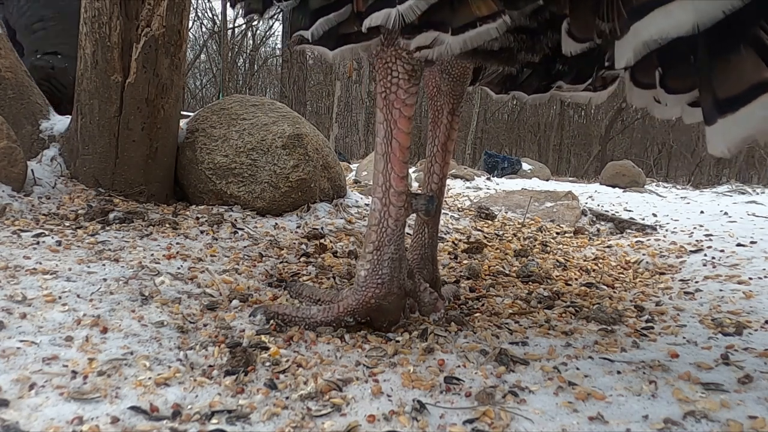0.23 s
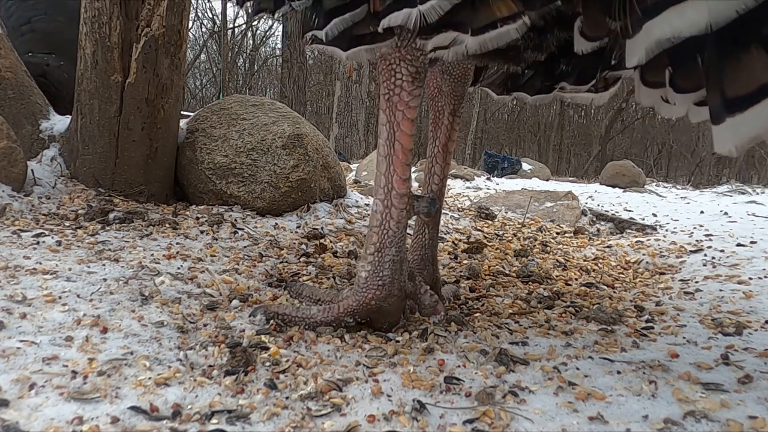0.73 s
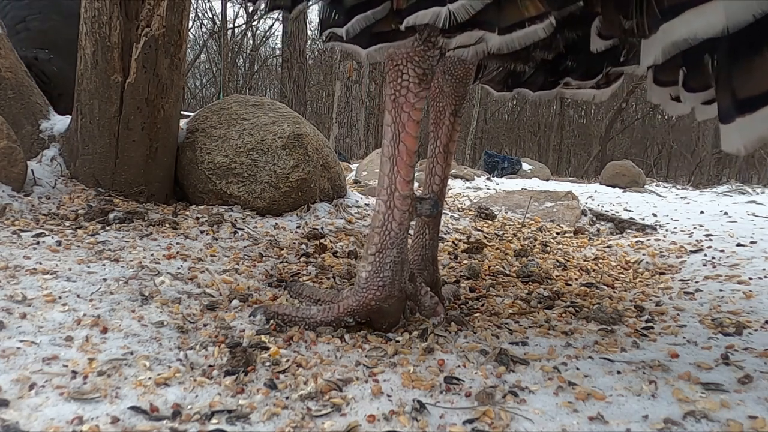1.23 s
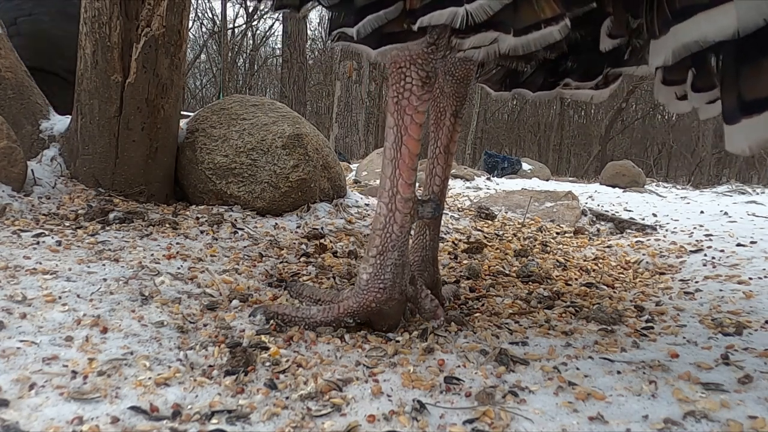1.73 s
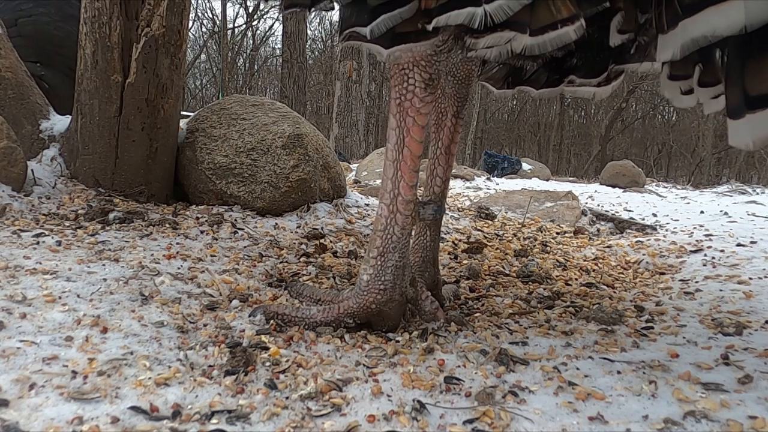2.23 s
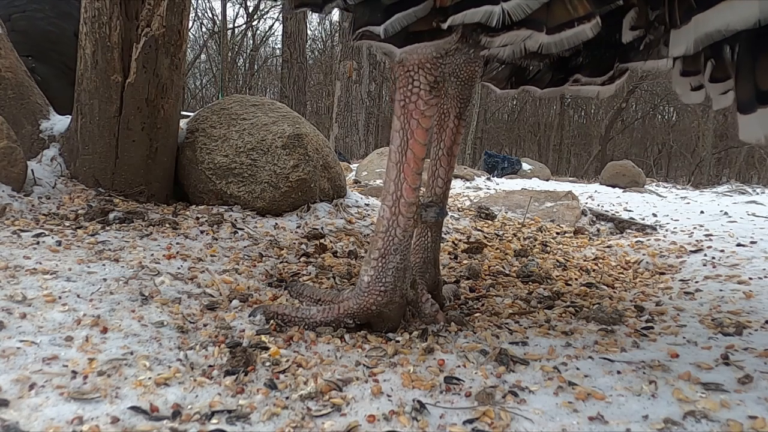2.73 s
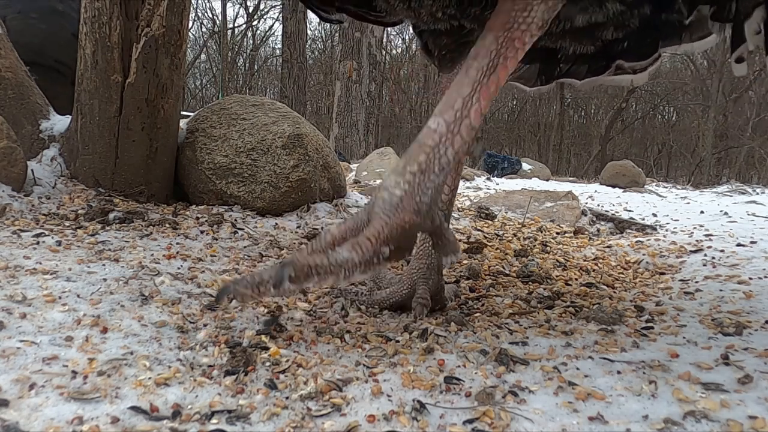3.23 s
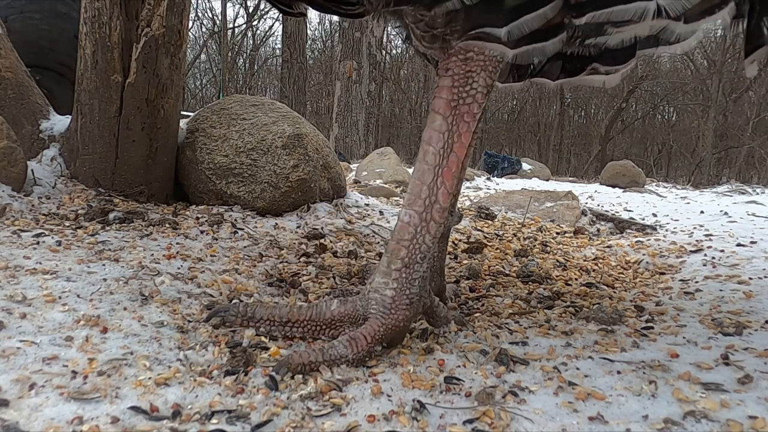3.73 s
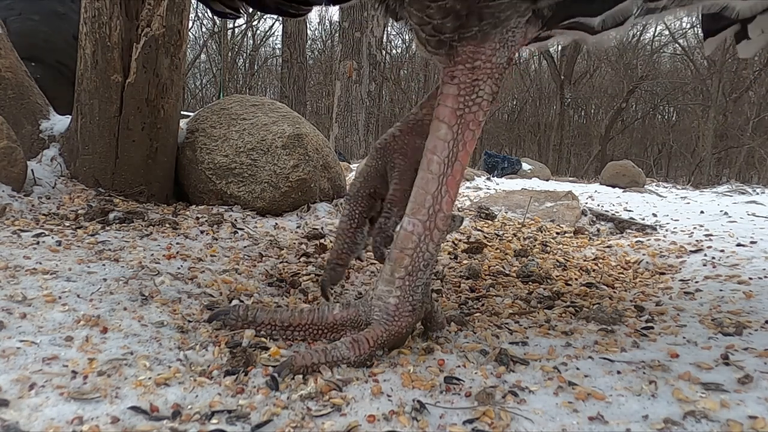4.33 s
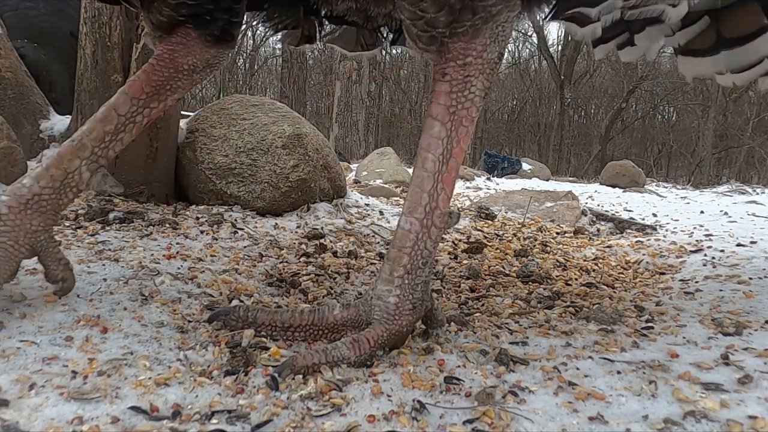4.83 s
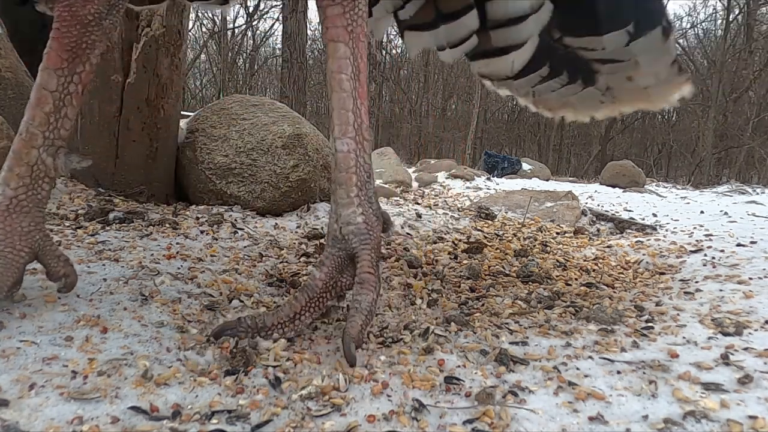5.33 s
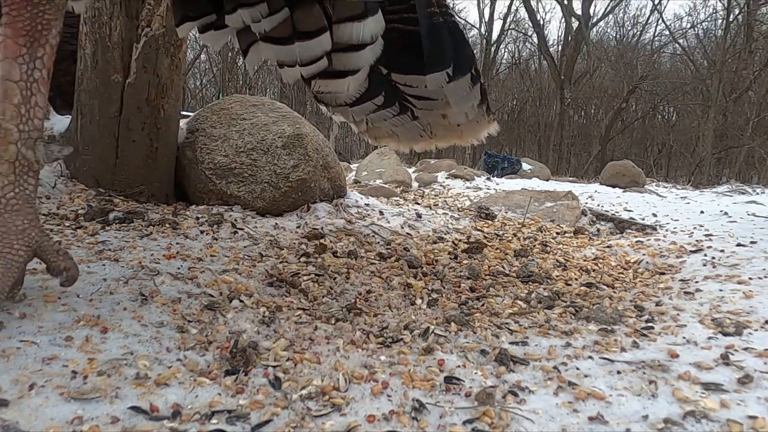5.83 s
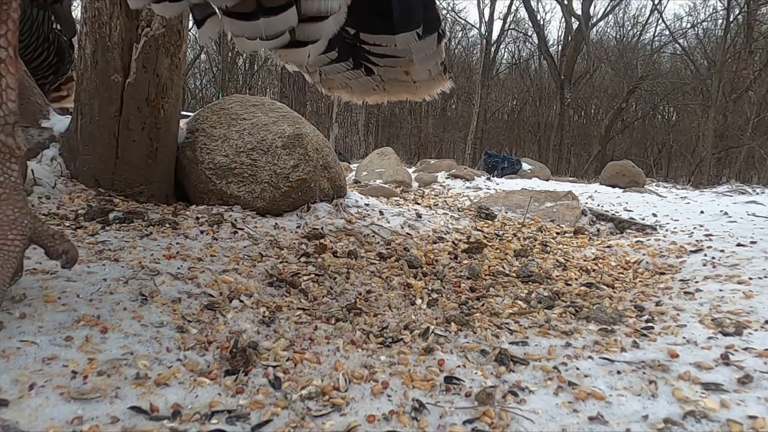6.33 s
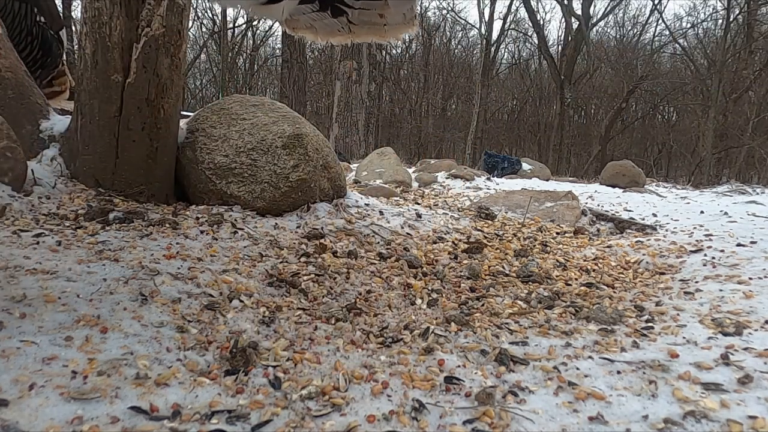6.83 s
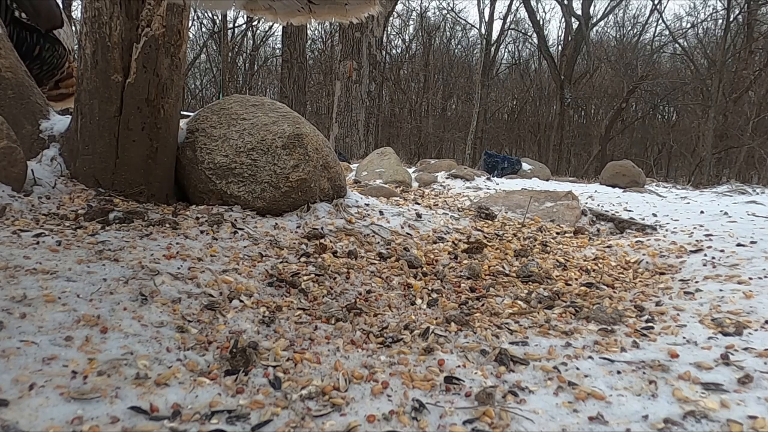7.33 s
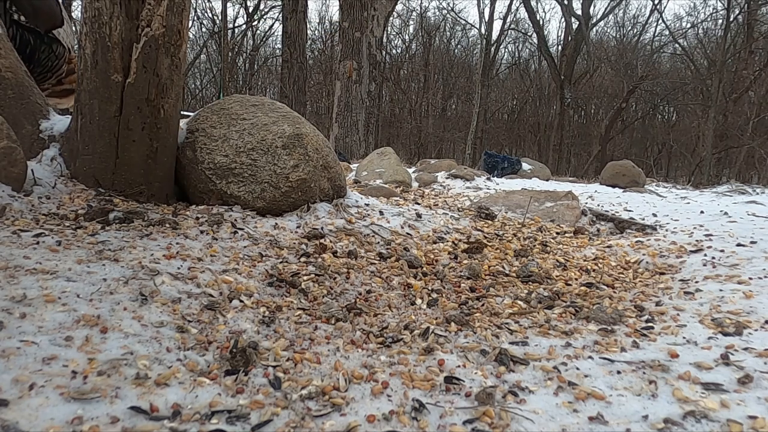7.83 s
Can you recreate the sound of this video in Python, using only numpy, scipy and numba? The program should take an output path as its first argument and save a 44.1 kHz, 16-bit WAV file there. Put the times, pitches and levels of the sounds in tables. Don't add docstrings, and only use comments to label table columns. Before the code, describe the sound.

A wild turkey purrs softly and crunches over seed husks on snow, then lets out one loud close gobble amid distant rumble and faint birds.

```python
import sys
import numpy as np
from scipy import signal
from scipy.fft import rfft, irfft
from scipy.io import wavfile
from scipy.ndimage import uniform_filter1d
from numba import njit

SR = 44100
rng = np.random.default_rng(int(sys.argv[2]) if len(sys.argv) > 2 else 0)


def persist_wave(psi):
    counts = np.round(np.clip(psi, -1, 1) * 32767).astype(np.int16)
    wavfile.write(sys.argv[1], SR, np.atleast_2d(counts).T)


def ratio(d):
    e = np.asarray(d, float) / 20
    return 10 ** e


N = 356548

# (time [s], held [s], drop [s], pitch [Hz], level [dB])
SQUEAKS = [
    (5.463, .012, 0.015, 3120, -33),
    (5.528, 0.018, 0.0077, 2878, -23),
    (5.667, 0.011, 0.0063, 2428, -28.5),
    (5.722, 0.013, 0.0052, 2473, -21.5),
    (5.856, 0.0079, 0.01, 2430, -36.5),
    (6.126, 0.0081, 0.011, 2480, -34.5),
]


def gobble():
    high, high_tops, drive = high_side()
    hoarse = np.clip(drive / 0.076, 0, 1)
    low, low_tops, push = low_side(hoarse)
    squeaks, leak = squeak()
    slack, slack_tops, swing = flutter()
    throb_depth = .6
    shake = ratio(0.22 * hoarse * walk(240)) * (1 + throb_depth * slack / (swing + 0.016))
    beat = 0.92 * (low * high_tops + high * low_tops)
    hiss = 0.45 * (drive + 0.15 * push + 0.4 * leak) * rng.standard_normal(N)
    tires_s, tire_db_per_s = 5.89, -24.5
    tire = ratio(tire_db_per_s * np.clip(np.arange(N) / SR - tires_s, 0, 1))
    tops = tire * (shake * (low_tops + high_tops + beat) + hiss)
    voice = windpipe(shake * (low + high)) + passband(throat(tops, hoarse), 570, 12500)
    return voice + squeaks + puff(low_tops) + slack + slack_tops + chest(push * tire ** 2)


def high_side():
    # (time [s], length [s], from [Hz], to [Hz], level [dB])
    high_rows = [(5.289, 0.018, 733, 750, -22), (5.391, 0.044, 921.8, 769.4, -19),
                 (5.488, 0.024, 1003, 1001, -31), (5.551, 0.019, 711, 731, -15),
                 (5.572, 0.06, 884, 1064, -20), (5.688, 0.014, 914.2, 871.5, -16.5),
                 (5.741, 0.014, 956, 929.4, -15.5), (5.793, 0.044, 869.4, 844, -28),
                 (5.877, 0.017, 946, 988.6, -19), (5.988, 0.015, 893, 925.5, -21),
                 (6.059, 0.037, 845.5, 832, -21.5), (6.148, 0.011, 922, 956, -22.5)]
    aftertone = (5.65, 0.03, 1085, 1050, -31)
    top_rich, short_rich, richer_per_s = 0.86, 0.51, 6.3
    notes = [(*n, min(top_rich, short_rich + richer_per_s * n[1])) for n in high_rows]
    return sing(sorted(notes + [(*aftertone, 0)]), .04 * walk(700), 0.008, .003)


def low_side(hoarse):
    # (time [s], length [s], from [Hz], to [Hz], level [dB])
    low_rows = [(5.289, 0.021, 536.4, 547.5, -17), (5.31, 0.023, 599, 624.6, -20),
                (5.331, 0.011, 605, 506, -26), (5.345, 0.044, 513, 678, -19),
                (5.381, 0.016, 721.4, 739.5, -18.5), (5.397, 0.041, 690, 604.4, -24.5),
                (5.487, 0.022, 680.6, 634, -21.5), (5.549, 0.081, 552.7, 599.7, -29.5),
                (5.795, 0.0098, 571.8, 603, -14.5), (5.807, 0.019, 615.5, 669.6, -24),
                (5.881, 0.0087, 678.6, 665, -17.5), (5.897, 0.025, 629, 692, -24),
                (5.921, 0.016, 718, 689.7, -21.5), (5.938, 0.025, 600.4, 600.3, -15.5),
                (5.966, 0.024, 590.6, 516.2, -15.5), (6.06, 0.035, 518, 681.6, -23.5)]
    # (time [s], pitch [Hz], level [dB])
    gulps = [
        (5.438, 680, -12.5),
        (5.504, 649, -10),
        (5.636, 619.8, -14.5),
        (5.703, 571, -15),
        (5.752, 604.8, -21.5),
        (5.829, 566.4, -13),
        (6.004, 519, -18),
        (6.096, 527.5, -13.5),
    ]
    rich, free_db, purer_per_db = 0.86, -17.5, 0.2
    gulp_s, gulp_sag, gulp_rich = .011, .085, 0.31
    notes = [(*n, rich - purer_per_db * max(n[-1] - free_db, 0)) for n in low_rows]
    notes += [(s, gulp_s, hz, hz * (1 - gulp_sag), db, gulp_rich) for s, hz, db in gulps]
    return sing(sorted(notes), (0.008 + 0.055 * hoarse) * walk(600), 0.0047, 0.0031)


def squeak_notes():
    sag, end_hz, squeak_rich, fall_rich = 0.018, 1700, 0.1, 0.38
    fall_db = -6.5
    notes = []
    for s, held, drop, hz, db in SQUEAKS:
        knee_hz = hz * (1 - sag)
        notes.append((s, held, hz, knee_hz, db, squeak_rich))
        notes.append((s + held, drop, knee_hz, end_hz, db + fall_db, fall_rich))
    return notes


def squeak():
    thin, thin_tops, leak = sing(squeak_notes(), 0.033 * walk(900), .003, 0.007)
    rasp_db, rasp_hz, rasp_width_hz = -17, 4350, 900
    drops = [(s + held, drop, db + rasp_db) for s, held, drop, hz, db in SQUEAKS]
    rasp = steep_band(rng.standard_normal(N), rasp_hz, rasp_width_hz)
    rasp *= 6 * ratio(bursts(drops, 4400, 1500))
    return thin + passband(thin_tops, 3900, 5800) + rasp, leak


def puff(low_tops):
    puff_hz, puff_width_hz, edge_db_per_s = 6900, 2300, 1499
    level_db = bursts([(5.378, 0.014, -37)], edge_db_per_s, edge_db_per_s)
    jet = rng.standard_normal(N) + 8 * low_tops
    return 4.3 * ratio(level_db) * steep_band(jet, puff_hz, puff_width_hz)


def flutter():
    # (time [s], length [s], from [Hz], to [Hz], level [dB])
    flutter_rows = [
        (5.293, 0.017, 177.5, 176.4, -24),
        (5.401, 0.044, 210.5, 199.5, -23.5),
        (5.491, 0.013, 180, 176.6, -29.5),
        (5.552, 0.043, 129.3, 168.1, -37.5),
        (5.6, 0.038, 174.3, 214.2, -32),
        (5.688, .016, 189.9, 188.8, -37),
        (5.747, 0.014, 186, 180.2, -38),
        (5.796, 0.012, 183, 194.4, -31.5),
        (5.879, 0.013, 224, 231.3, -43),
        (6.064, 0.033, 164.2, 186.3, -34.5),
    ]
    buzz_rich, settles_s = .4, .036
    notes = [(*n, buzz_rich * (n[1] < settles_s) + 0.12) for n in flutter_rows]
    return sing(notes, 0.035 * walk(100), 0.0047, 0.0013)


def throat(tops, hoarse):
    # (centre [Hz], width [Hz], level [dB])
    shut_rows = [(1150, 410, -8.5), (1720, 554, -1), (2360, 200, -21), (4230, 400, -14.5),
                 (6300, 660, -19.5), (8700, 1200, -22), (11500, 5000, -30.5)]
    # (centre [Hz], width [Hz], level [dB])
    open_rows = [(1480, 180, -10), (1800, 530, -8), (2230, 330, -4), (3000, 280, -5), (3390, 50, -14.5),
                 (4200, 380, -5.5), (4750, 400, -5), (5520, 260, -12), (7000, 2400, -20),
                 (10800, 21000, -33.5)]
    # (time [s], centre [Hz], level [dB], treble let out [dB])
    mouth = [
        [(5.29, 2310, -3, 2.5), (5.33, 2340, -3, 1), (5.345, 2300, -3, -9), (5.372, 2300, -2.5, -15),
         (5.39, 2360, -3, -2), (5.44, 2520, -7.5, -1)],
        [(5.485, 2810, 1.5, 3), (5.515, 2910, 1.5, -3.5), (5.56, 1960, -6.5, 0), (5.60, 2680, 2, 1),
         (5.645, 2739, -5, 0.5), (5.685, 3000, 4, 1), (5.745, 3020, 1, -1.5), (5.77, 3000, -11.5, -4.5)],
        [(5.80, 2580, -4.5, -1), (5.835, 2830, -2, 0), (5.88, 3000, -6, -1), (5.93, 2708, 1, 0),
         (5.955, 3000, -0.5, 7.5), (6.0, 2920, 2, -5.5), (6.07, 2676, -4, -5.5), (6.1, 2711, -2, 1),
         (6.155, 2820, -1, 4)],
    ]
    # (centre [Hz], width [Hz], share swallowed)
    pockets = [
        (1200, 260, .95),
        (3620, 600, .9),
        (6100, 500, .5),
    ]
    # (centre [Hz], width [Hz], level [dB])
    sacs = [(1010, 12, -14), (1510, 12, -4), (2660, 18, -14), (3230, 16, -6), (5300, 30, -16)]
    mouth_hz, mouth_db, treble_db = curve(sum(mouth, []))
    mouth_width_hz, beak_opens_s = 260, 5.39
    beak = np.clip((np.arange(N) / SR - beak_opens_s) / .015 + .5, 0, 1)
    upper = ratio(treble_db) * passband(tops, 3300, 16000)
    clear = .4 - .1 * hoarse
    tops = passband(tops, 300, 3300) + upper * (.45 + clear + (.8 - clear) * walk(3500))
    out = np.zeros(N)
    for rows, share in ((shut_rows, 1 - beak), (open_rows, beak)):
        for hz, width, db in rows:
            waver = ratio(db + 6 + 1.6 * walk(70))
            out += waver * band(band(share * tops, hz, width), hz, 0.85 * width)
    gape = glide(glide(beak * tops, mouth_hz, 1. * mouth_width_hz), mouth_hz, 1. * mouth_width_hz)
    out += ratio(mouth_db + 9) * gape
    for hz, width, share in pockets:
        out = out - share * beak * band(out, hz, width)
    out = out - .9 * (1 - beak) * band(out, 3350, 1100)
    return out + sum(ratio(db) * band(band(beak * tops, hz, 5 * width), hz, width) for hz, width, db in sacs)


def windpipe(fundamentals):
    pipe = passband(fundamentals, 460, 1130)
    return pipe + .21 * band(pipe, 550, 55) + .25 * band(pipe, 930, 49) + .15 * band(pipe, 810, 14)


def chest(breath):
    # (time [s], hold [s], level [dB], pitch [Hz])
    gasps = [(5.30, 0.03, -18, 66.9), (5.345, 0.021, -26.5, 65.4), (5.46, 0.0052, -24.5, 81.1),
             (5.53, 0.0059, -26, 84), (5.59, 0.049, -38, 62.5), (5.67, .02, -30, 78.8),
             (5.725, 0.012, -29, 88.4), (5.805, 0.025, -27, 80.4), (5.86, 0.022, -27.5, 78.1),
             (5.94, 0.0092, -32.5, 67.6), (5.99, 0.035, -35, 72.3), (6.06, 0.035, -29.5, 80.8),
             (6.13, 0.042, -29, 82.5), (6.2, 0.021, -41.5, 84.2)]
    hz = curve(gasps)[-1]
    db = bursts([g[:-1] for g in gasps], 519.5, 440)
    turn = 2 * np.pi * np.cumsum(hz * (1 + 0.07 * walk(50))) / SR
    boom = np.sqrt(2) * ratio(db + 2.2 * walk(60)) * (np.sin(turn) + .14 * np.cos(2 * turn))
    deep = passband(rng.standard_normal(N), 21, 55) * np.sqrt(SR / 70)
    soft = passband(rng.standard_normal(N), 55, 140) * np.sqrt(SR / 540)
    return boom + ratio(db - 9) * deep + (ratio(db - 13.5) + 0.035 * breath) * soft


def purr():
    # (time [s], pitch [Hz], level [dB])
    warbles = [
        [(.007, 688, -45.5), (.040, 851, -45), (.052, 652, -53), (.065, 1070, -56), (.076, 960, -66),
         (.096, 878, -38.5), (.115, 853, -45), (.129, 1150, -75)],
        [(2.717, 829, -47), (2.739, 658, -44.5), (2.760, 1096, -39), (2.778, 820, -45), (2.794, 1150, -73),
         (2.811, 957, -43), (2.833, 651, -42.5), (2.844, 1364, -53), (2.853, 1370, -75)],
    ]
    # (time [s], length [s], from [Hz], to [Hz], level [dB])
    flicks = [
        (0.159, 0.008, 710, 820, -41.5),
        (0.168, 0.0088, 890, 1250, -41),
        (0.215, 0.0079, 770, 1200, -43.5),
        (.262, 0.0083, 816, 1370, -32.5),
        (2.686, 0.011, 484, 642, -50),
        (2.875, 0.014, 815, 946, -37),
        (2.882, 0.00973, 903, 1650, -35.5),
        (2.928, 0.0067, 787, 1450, -42),
        (2.975, 0.01, 824, 1460, -34.5),
    ]
    notes = list(flicks)
    for rows in warbles:
        for a, b in zip(rows, rows[1:]):
            notes.append((a[0], b[0] - a[0], a[1], b[1], a[2]))
    first_rich, second_rich = 0.067, 0.12
    notes = [(*n, first_rich if n[0] < 1 else second_rich) for n in sorted(notes)]
    tone, tops, _ = sing(notes, 0.0125 * walk(400), 0.0049, 0.000084)
    return 1.43 * passband(band(tone + tops, 1010, 460), 400, 2740)


def feet():
    # (time [s], peak level [dB], centre [Hz])
    cracks = [(0.5913, -54, 2100), (.657, -54, 1690), (1.775, -64, 3970), (2.576, -48.5, 2850),
              (3.1897, -37.5, 3150), (3.2366, -44, 1940), (3.436, -53, 3000), (3.443, -38.5, 3300),
              (3.448, -48, 2940), (3.453, -45, 2520), (4.1395, -49, 2600), (4.195, -55, 1800),
              (4.312, -47, 1500), (4.322, -41, 1990), (4.36, -41, 2070), (4.379, -38.5, 1980),
              (4.386, -42, 1700), (4.451, -44.5, 1930), (4.9406, -42.5, 4440), (6.639, -60, 2715),
              (6.819, -50, 1997), (6.9228, -53, 2515), (8, -52.5, 1515)]
    # (time [s], peak level [dB], centre [Hz])
    ticks = [(0.6534, -60, 6500), (2.30, -66, 7500), (2.442, -69, 8000), (2.576, -54.5, 6160),
             (2.586, -60, 7650), (2.62, -57, 7000), (2.698, -61, 7400), (2.707, -58, 7250),
             (2.7898, -59, 6500), (2.805, -63, 7000), (2.87, -68, 7500), (2.8962, -57, 7500),
             (2.935, -63, 7550), (2.9494, -61, 7000), (2.985, -61, 7800), (3.0, -65, 7500),
             (3.02, -62, 7580), (3.04, -58, 7400), (3.1024, -58, 6500), (4.209, -53.5, 5500),
             (4.493, -55, 6000), (5.022, -56, 5600), (7.0443, -58, 5880)]
    # (time [s], hold [s], dull crunch [dB], bright rustle [dB])
    drags = [(2.094, .33, -80.5, -86), (2.58, 0.49, -77.5, -86), (3.222, 0.027, -62, -76.5),
             (3.434, 0.034, -66, -78), (3.52, 0.12, -65.5, -84), (3.66, 0.055, -65.5, -82.5),
             (4.02, 0.094, -71, -88), (4.135, 0.08, -62.5, -79), (4.24, 0.19, -66, -81),
             (4.75, 0.011, -78, -99), (5.0, 0.13, -70.5, -80.5), (5.12, 0.41, -68.5, -83.5),
             (6.799, 0.16, -81, -84), (7.119, 0.0095, -84, -101), (7.53, 0.019, -74, -80.5),
             (7.62, 0.22, -75.5, -81), (7.855, 0.19, -79, -82.5)]
    spray_db = bursts([(s, 0, db) for s, db, hz in cracks], 900, 550)
    dull_drag_db = bursts([(s, hold, dull) for s, hold, dull, bright in drags], 400, 199)
    bright_drag_db = bursts([(s, hold, bright) for s, hold, dull, bright in drags], 400, 199)
    dull_db = np.maximum(spray_db - 22.5, dull_drag_db)
    bright_db = np.maximum(spray_db - 42.5, bright_drag_db)
    size = ratio(2.2 * np.minimum(rng.exponential(size=(2, N)), 5))
    grains = rng.standard_normal((2, N)) * size * (rng.random((2, N)) < .2)
    grains /= grains.std()
    out = ratio(dull_db + 10.0 + 1.8 * walk(60)) * passband(grains[0], 850, 3800)
    out += ratio(bright_db + 14 + 2.5 * walk(60)) * passband(grains[1], 4000, 8800)
    out += ratio(dull_db - 15.5 + 3 * walk(40)) * passband(grains[1], 8800, 15000)
    # (crumble [s], crumble strength, width as a share of the centre)
    husk, ice = (0.006, 0.22, 1), (0.0076, 0.43, .4)
    t = np.arange(1500) / SR
    for s, db, hz, crumble_s, crumble, wide in [(*c, *husk) for c in cracks] + [(*c, *ice) for c in ticks]:
        noise = rng.standard_normal(1500)
        snap = (1 + noise) * np.exp(-t / 0.00035)
        snap += crumble * np.clip(noise, -2.2, 2.2) ** 3 / 3 * np.exp(-t / crumble_s)
        width = wide * hz * 1.1
        crack = band(steep_band(snap, hz, width), hz, width)
        start = int(s * SR)
        out[start:start + 1500] += ratio(db + 2.0) * crack / np.abs(crack).max()
    return out


def songbirds():
    # (time [s], length [s], top [Hz], share of the rise done at the knee, level [dB])
    chips = [
        (2.037, 0.034, 7290, 0.94, -52.5),
        (4.415, 0.056, 7700, 0.63, -61.5),
        (4.722, 0.036, 8200, 0.4, -61),
        (6.787, .034, 7500, .68, -67.5),
        (7.36, 0.071, 7530, 0.75, -72.5),
    ]
    # (time [s], length [s], from [Hz], to [Hz], level [dB])
    slurs = [
        (2.072, 0.021, 4160, 4310, -67),
        (2.081, 0.024, 4200, 2300, -76),
        (3.084, 0.03, 3920, 4020, -69.5),
        (3.11, 0.026, 4030, 3320, -69),
        (3.55, 0.051, 5140, 4670, -67.5),
    ]
    start_hz, knee_time, top_step_db = 5900, 0.68, 0.5
    notes = []
    for s, length, top_hz, rise, db in chips:
        early = knee_time * length
        knee_hz = start_hz + rise * (top_hz - start_hz)
        notes.append((s, early, start_hz, knee_hz, db, 0))
        notes.append((s + early, length - early, knee_hz, top_hz, db + top_step_db, 0))
    song = sing(sorted(notes), 0.0087 * walk(250), 0.0038, 0.0019)[0] * ratio(2.5 * walk(200))
    return song + sing([(*n, 0) for n in slurs], 0.0129 * walk(200), .004, .002)[0]


def chatter():
    # (time [s], length [s], from [Hz], to [Hz], level [dB])
    chatter_rows = [(.45, .08, 4500, 4900, -90), (.53, 0.084, 4930, 5100, -83),
                    (0.635, 0.031, 3980, 3600, -73), (0.682, 0.042, 3500, 3100, -85),
                    (.82, 0.036, 5650, 5180, -80), (0.846, 0.11, 4500, 4550, -74.5),
                    (0.9, 0.071, 4020, 3200, -76), (0.96, 0.1, 4500, 4500, -82),
                    (1.15, 0.08, 4900, 4700, -87), (1.25, 0.067, 3390, 3340, -78),
                    (1.325, 0.021, 5360, 5100, -78), (1.347, 0.038, 3990, 3730, -67.5),
                    (1.373, 0.064, 4850, 4600, -76), (1.443, 0.044, 3630, 3040, -78),
                    (1.506, 0.05, 4750, 4600, -86), (1.6, 0.33, 4420, 4570, -91),
                    (2.597, 0.046, 3842, 3598, -69), (2.897, 0.11, 3310, 3890, -83),
                    (3.895, 0.078, 3820, 4450, -83), (4.493, 0.11, 4180, 3630, -82.5)]
    return sing([(*n, 0) for n in chatter_rows], 0.062 * walk(300), .02, 0.004)[0]


def air():
    # (frequency [Hz], density [dB per Hz])
    spectrum_rows = [(12, -11), (22, -3), (60, -1), (120, -4), (180, -5), (342, -19), (491, -28.5),
                     (857, -39), (1370, -41.5), (1920, -55), (4500, -50.5), (8200, -57), (9000, -70.5),
                     (15500, -85.5)]
    # (time [s], level [dB])
    road = [(0.0, -42), (1.4, -44.5), (2.85, -44), (3.0, -45.5), (3.75, -43.5), (4.0, -44.5), (4.44, -44.5),
            (5.2, -43), (6.3, -54), (6.9, -47.5), (7.3, -45), (8.0, -42)]
    air_db = -41.5
    f = np.arange(N // 2 + 1) * SR / N + 1
    hz, density_db = np.transpose(spectrum_rows)
    spectrum = rfft(rng.standard_normal(N)) * ratio(np.interp(np.log(f), np.log(hz), density_db))
    scale = ratio(air_db) / irfft(spectrum, N).std()
    road_db = curve(road)[0] - air_db
    duck_s, duck_db, recover_s = 7.9, -4, 0.88
    t = np.arange(N) / SR
    gain_db = duck_db * np.exp(-np.maximum(t - duck_s, 0) / recover_s) * (t > 5.3)
    out = np.zeros(N)
    for octave in np.arange(4, 14.5, .5):
        share = np.clip(1 - 2 * np.abs(np.log2(f) - octave), 0, 1)
        far = np.clip((10.5 - octave) / 1.6, 0, 1)
        flicker_db = 0.59 * walk(10.0) + 0.54 * walk(2.4)
        out += irfft(spectrum * share, N) * ratio(far * road_db + (1 - far) * gain_db + flicker_db)
    return out * scale


def wood(x, t60_s, wet_db, top_hz, echoes=()):
    t = np.arange(SR) / SR
    tail = rng.standard_normal(SR) * np.exp(-np.log(1000) * t / t60_s) * np.clip(t / 0.0019, 0, 1)
    tail = signal.lfilter(*signal.butter(1, top_hz, fs=SR), tail)
    tail *= ratio(wet_db) / np.sqrt(np.sum(tail ** 2))
    for lag_s, db in echoes:
        tail[int(lag_s * SR)] += ratio(db)
    return x + signal.fftconvolve(x, tail)[:N]


def sing(notes, jitter, slew_s, release_s):
    hz, gain, bright = np.zeros((3, N))
    for s, length, from_hz, to_hz, db, strength in notes:
        a, b = int(s * SR), int((s + length) * SR)
        lead = a - 130 * int(gain[a - 200] == 0)
        hz[lead:a], hz[a:], bright[lead:] = from_hz, to_hz, strength
        hz[a:b] = np.linspace(from_hz, to_hz, b - a)
        gain[a:b] = ratio(db) * np.sqrt(2)
    k, fade = int(slew_s * SR), np.exp(-1 / (release_s * SR))
    gain = signal.lfilter([1 - fade], [1, -fade], uniform_filter1d(gain, k))
    r = np.clip(uniform_filter1d(bright, k), 0, .93)
    cos = np.cos(2 * np.pi * np.cumsum(uniform_filter1d(hz, k // 2) * (1 + jitter)) / SR)
    stack = (cos - r) / (1 - 2 * r * cos + r ** 2)
    return gain * cos, gain * (stack - cos), gain


def bursts(rows, swell_db_per_s, fade_db_per_s):
    t, out = np.arange(N) / SR, np.full(N, -120.)
    for s, hold, db in rows:
        below_db = np.maximum(swell_db_per_s * (s - t), fade_db_per_s * (t - s - hold))
        out = np.maximum(out, db - np.maximum(0, below_db))
    return out


def band(x, hz, width):
    return signal.lfilter(*signal.iirpeak(min(hz, 16000), hz / width, fs=SR), x)


def steep_band(x, hz, width):
    return band(band(x, hz, width), hz, width)


def passband(x, lo_hz, hi_hz):
    return signal.sosfilt(signal.butter(3, [lo_hz, hi_hz], "band", fs=SR, output="sos"), x)


@njit
def glide(x, hz, width):
    y, b, l = np.empty(len(x)), 0., 0.
    for i in range(len(x)):
        g, k = np.tan(np.pi * hz[i] / SR), width / hz[i]
        v = (b + g * (x[i] - l)) / (1 + g * (g + k))
        b, l, y[i] = 2 * v - b, l + 2 * g * v, k * v
    return y


def walk(rate):
    k = int(SR / rate)
    return 1.2 * uniform_filter1d(np.repeat(rng.standard_normal(N // k + 1), k), k)[:N]


def curve(rows):
    s, *columns = np.transpose(rows)
    return [np.interp(np.arange(N) / SR, s, c) for c in columns]


def scene():
    ground = wood(gobble() + purr() + feet(), 0.074, -20.5, 8500)
    near = wood(ground, 0.52, -33.0, 2200, [(.004, -23.5)])
    far = wood(songbirds(), 0.55, -6.0, 9000, [(.013, -15), (.043, -10), (.062, -20), (.088, -33)])
    calls = chatter()
    far += wood(calls, 0.8, 5.6, 12000) - 0.17 * calls
    return (near + far + air())[None]


def top_cut(x):
    return signal.sosfilt(signal.butter(12, 15630, fs=SR, output="sos"), x)


def record(dry):
    soft = np.tanh(.9 * dry) / .9
    return top_cut(soft)


dry = scene()
out = record(dry)
persist_wave(out)
```